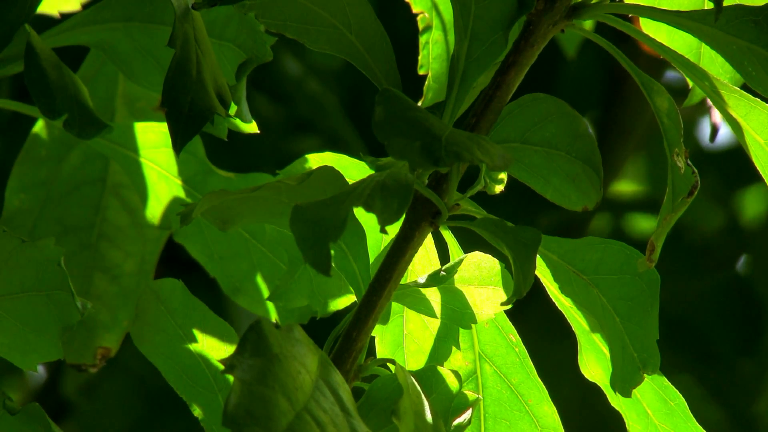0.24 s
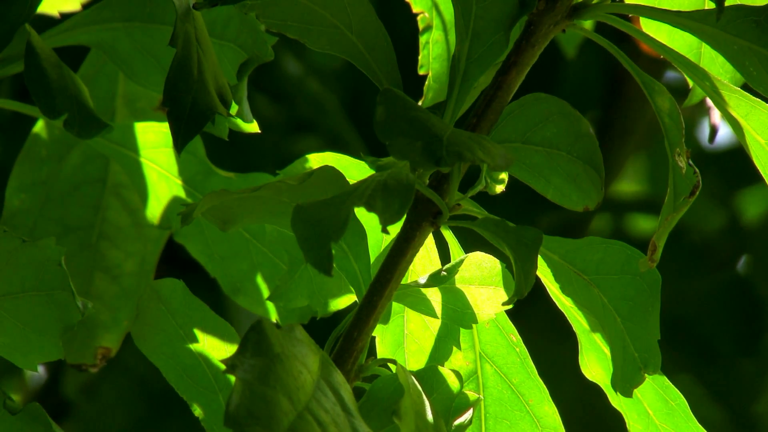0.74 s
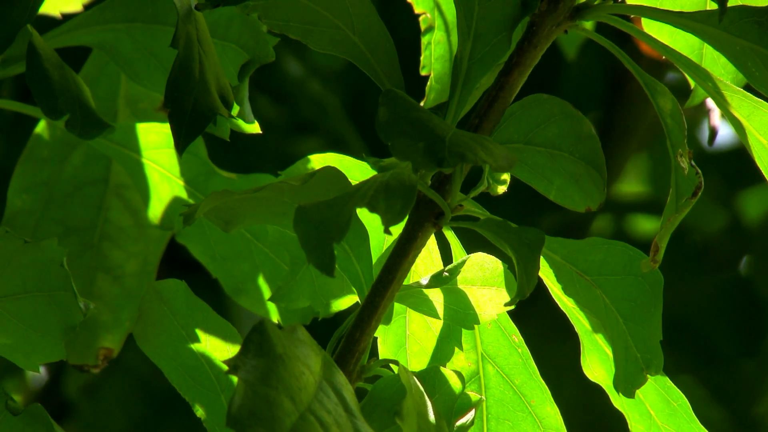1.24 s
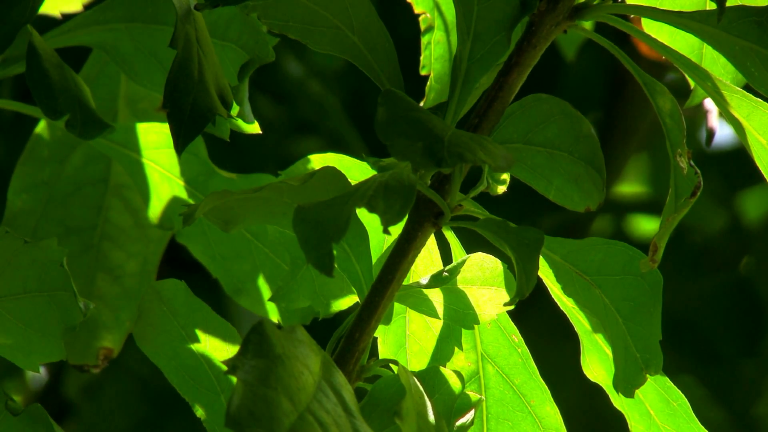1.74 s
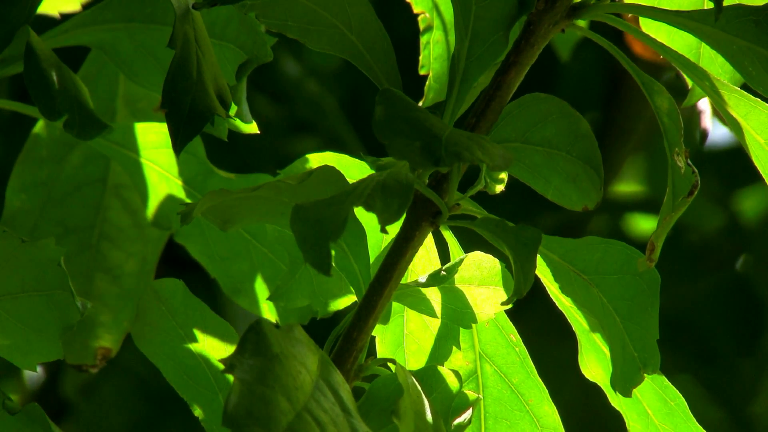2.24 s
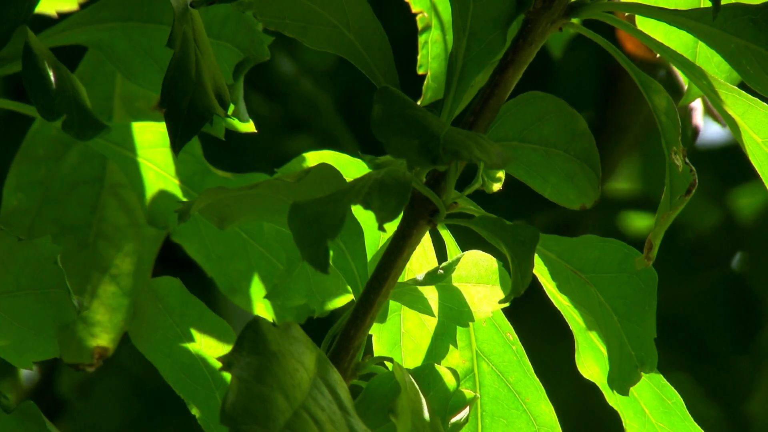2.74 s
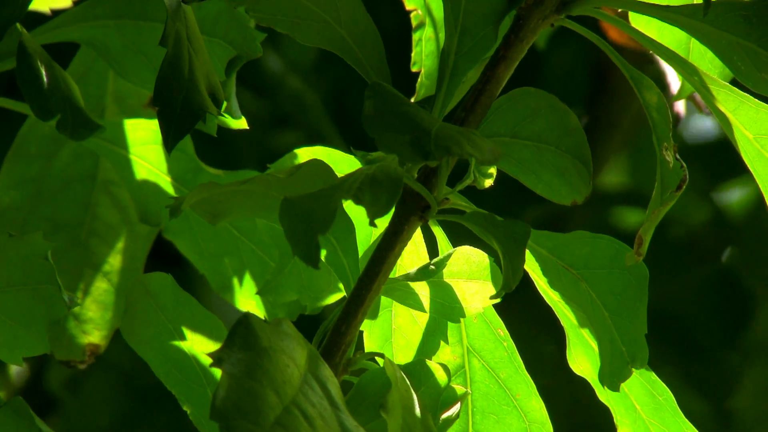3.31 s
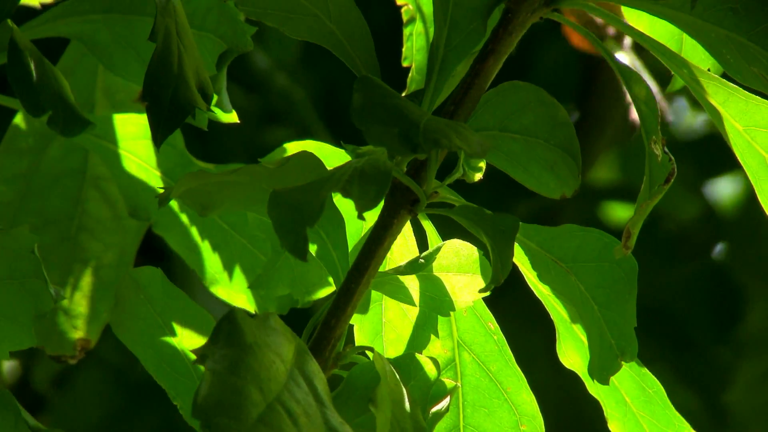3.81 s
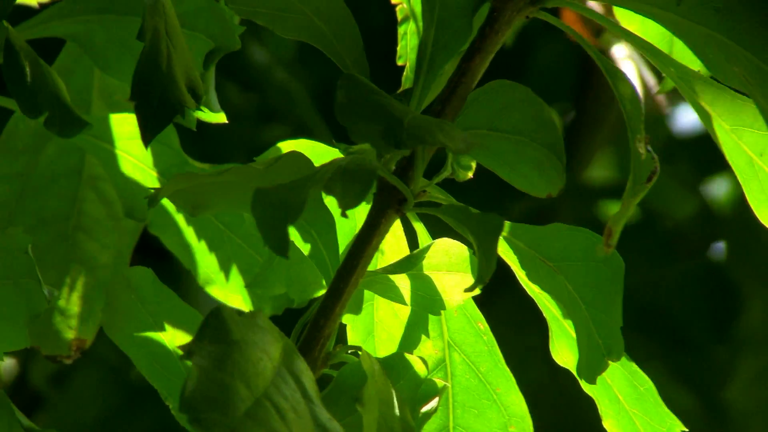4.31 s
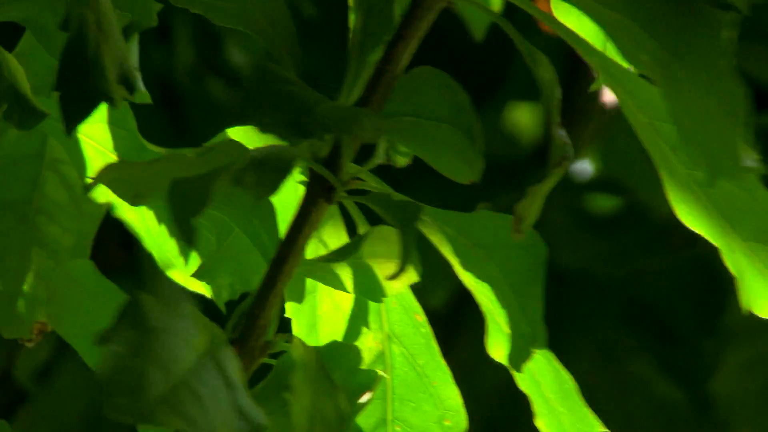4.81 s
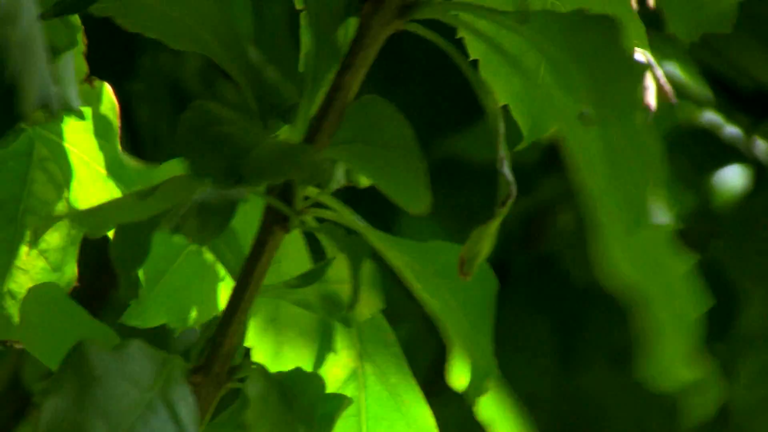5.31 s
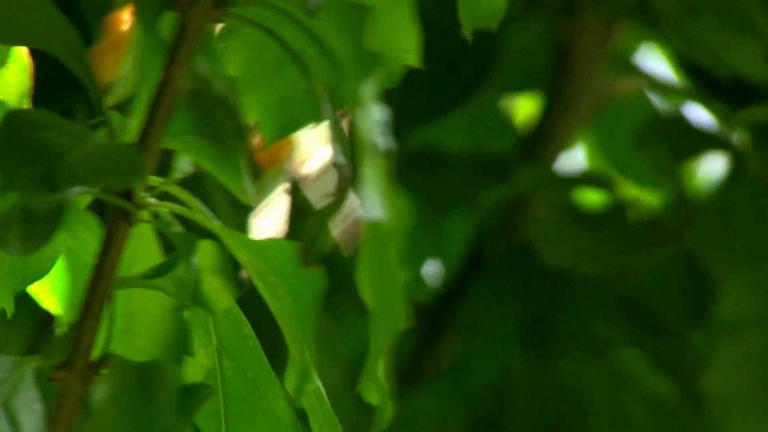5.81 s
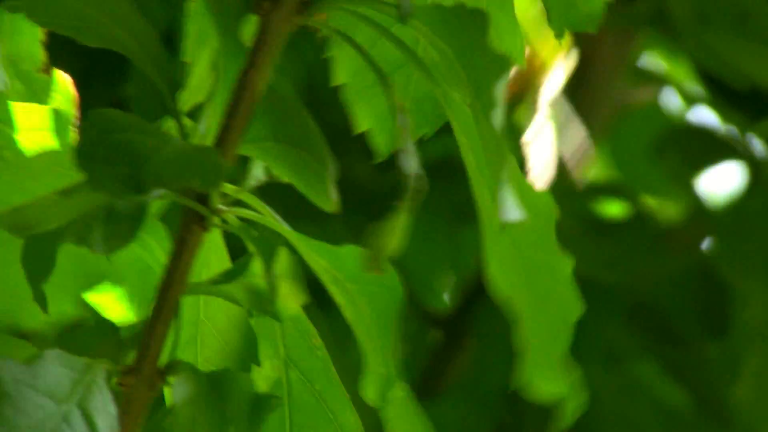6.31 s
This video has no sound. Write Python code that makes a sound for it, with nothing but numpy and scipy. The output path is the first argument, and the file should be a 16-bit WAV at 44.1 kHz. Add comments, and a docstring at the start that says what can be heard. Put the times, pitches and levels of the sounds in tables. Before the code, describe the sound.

A quiet garden, with soft distant traffic hum, faint leaf hiss and barely noticeable wind. From 0 to 1.3 seconds, tiny far whistles and blurred twitter come from other birds. At about 1.35 a nearby songbird gives a soft two-part note, then from 1.6 to 2.15 a quiet, thin whistle that drops steeply from very high and slides on down, with more faint twitter at its end. At 2.3 the song bursts out much louder: a fast, regular trill, roughly eight syllables a second, each a quick upward whistle and a snapping plunge into a short falling one. It grows fuller and brighter through 3 to 4.5, then eases slightly and ends near 5.6. Short echoes and a leafy tail follow each note, and a fine treble hiss swells with the song. Afterwards come faint distant chips, slightly stronger leaf hiss and traffic, and a small low wind bump at 6.4.

```python
"""Songbird in a leafy garden

A soft two-part note, one long falling whistle, then a fast series of rising and falling whistles, all
near sines with faint overtones and hiss. Discrete echoes and decaying noise stand for a near surface and
foliage. Far birds are short glides with noise tails; traffic, leaves and light wind are shaped noise,
and a treble hiss swells with the song."""
import sys
import numpy as np
from scipy import signal
from scipy.fft import rfft, irfft, next_fast_len
from scipy.io import wavfile
from scipy.ndimage import uniform_filter1d

SR = 44100
rng = np.random.default_rng(int(sys.argv[2]) if len(sys.argv) > 2 else 0)


def generate_wav(sig):
    """Save sig (samples, or channels by samples) to the path in sys.argv[1] as 16-bit PCM at SR."""
    pcm = np.round(np.clip(np.atleast_2d(sig).T, -1, 1) * 32767).astype(np.int16)
    wavfile.write(sys.argv[1], SR, pcm)


N = 288855


def from_db(db):
    """Turn dB into an amplitude gain."""
    return 10 ** (np.asarray(db) / 20)


def rms_one(x):
    """Scale to rms 1."""
    return x / np.sqrt(np.mean(x ** 2) + 1e-20)


def at_hz(points, hz, axis=1):
    """Read a table column on a log-frequency axis."""
    points = np.array(points)
    return np.interp(np.log(np.maximum(hz, 1)), np.log(points[:, 0]), points[:, axis])


def coloured(spectrum, size=N):
    """White noise shaped by a spectrum, then scaled to rms 1."""
    hz = np.fft.rfftfreq(size, 1 / SR)
    return rms_one(irfft(rfft(rng.standard_normal(size)) * from_db(at_hz(spectrum, hz)), size))


def drift(rate_hz):
    """Random wander of rms 1: noise through two equal one-pole lowpasses at the given rate."""
    pole = np.exp(-2 * np.pi * rate_hz / SR)
    wander = signal.lfilter([1], [1, -2 * pole, pole * pole], rng.standard_normal(N + SR))
    return rms_one(wander[SR:])     # the filter settles during the first second


def singer():
    """Each side of the voice box sings its own notes: one the rises, the other the falls and long whistle."""
    # syllables, a rise then a fall: [plunge t/s, rise level/dB, fall level/dB, landing f/Hz]
    syllables = [(1.382, -37.5, -33.5, 3172), (2.337, -21.5, -18, 3300), (2.4640, -17.5, -16.5, 3600),
                 (2.5920, -17.5, -16, 3540), (2.714, -16.5, -17, 3790), (2.8368, -15, -17.5, 3520),
                 (2.96, -15, -17, 3805), (3.0844, -14, -19.5, 3650), (3.2061, -14, -17.5, 3820),
                 (3.3283, -14.5, -17, 3910), (3.4509, -13.5, -16, 3760), (3.5730, -13, -14.5, 3790),
                 (3.6960, -14.5, -16.5, 3705), (3.8180, -14, -15.5, 3710), (3.9400, -14.5, -16.5, 3740),
                 (4.0614, -14, -16.5, 3830), (4.1827, -15, -17, 3985), (4.304, -14.5, -16, 3730),
                 (4.4259, -14, -14.5, 4110), (4.5482, -14.5, -16, 3915), (4.673, -15, -16, 3920),
                 (4.7994, -15, -18.5, 4150), (4.9253, -15.5, -18, 4080), (5.0513, -17, -18, 3950),
                 (5.1774, -17.5, -22.5, 3940), (5.3011, -16.5, -18, 4010), (5.4284, -17, -21, 3940),
                 (5.559, -17.5, -20, 3970)]
    # how the voice changes through the song:
    # [t/s, rise lead before plunge/s, glide length/s, glide end f/Hz, plunge level/dB, brightness/dB]
    voice = [(1.377, 0.036, 0.027, 3057, -22, -15), (2.333, 0.047, 0.017, 2900, -12.5, -15),
             (2.47, .047, 0.02, 2956, -15.5, -7), (3.15, .048, 0.024, 3087, -6, -5),
             (3.8, .048, 0.022, 3018, -10, -2.5), (4.393, .048, .025, 3080, -9.5, -2),
             (4.949, .049, 0.023, 3140, -8.5, -6.5), (5.56, .048, 0.022, 3166, -15.5, -10)]
    # from a moment during the long whistle, before the trill, rises and plunges grow towards full size
    warm_up_start_s, warm_up_s = 1.9, .36
    low_voice, high_voice = silence(), silence()
    when, *settings = np.transpose(voice)
    for start, rise_db, fall_db, land_hz in syllables:
        lead, glide_s, end_hz, plunge_db, bright_db = (np.interp(start, when, c) for c in settings)
        warm = 1 - np.exp(-max(start - warm_up_start_s, 0) / warm_up_s)
        low_voice = rise(low_voice, start - lead, rise_db, bright_db, warm)
        high_voice = fall(high_voice, start, land_hz, end_hz, glide_s, plunge_db, fall_db, bright_db, warm)
    slide, singing = long_whistle()
    return whistle(low_voice) + whistle(np.where(singing, slide, high_voice))


def rise(track, start, level_db, bright_db, warm):
    """A pitch climb that swells and fades; warming up makes it longer and higher."""
    # shape of a rise: [share of its length, share of the pitch climb, level/dB]
    shape = [(-.12, -.1, -66), (.001, -0.044, -23.5), (0.201, 0.21, -11.5), (.4, .48, -5.5),
             (0.618, .72, -4), (.85, .92, -11.5), (1.001, 1.001, -13.5), (1.118, 1.01, -56)]
    start_hz = 1581
    top_hz = 2480 + warm * (2804 - 2480)
    length_s = .014 + warm * (.036 - .014)
    share, climb, shape_db = np.transpose(shape)
    hz = start_hz + climb * (top_hz - start_hz)
    return lay(track, start + share * length_s, hz, shape_db + level_db, bright_db, 0)


def fall(track, start, land_hz, end_hz, glide_s, plunge_db, level_db, bright_db, warm):
    """A plunge of a few milliseconds onto the landing pitch, then a slower glide down."""
    # pitch of the plunge: [t/s, f above landing/Hz at depth 1]
    plunge_shape = [(-.001, 3800), (.0005, 2657), (.0016, 1289), (.0027, 400), (.0039, 40)]
    # at those points: [level/dB, extra hiss/dB]
    plunge_level = [(-31.5, 10), (-26.5, 27.5), (-18.5, 36.5), (-15, -1), (-16, -7)]
    # glide after the plunge: [share of its length, share of the way still to fall, level/dB]
    glide = [(0.079, 0.85, -12.5), (.25, 0.59, -6), (0.512, .36, -1.5), (0.75, 0.16, -2),
             (1.001, .001, -7.5), (1.119, 0.0071, -74)]
    duller_db = -6     # overtones and hiss against those of the rise
    depth = .45 + warm * (.94 - .45)
    t, above_hz = np.transpose(plunge_shape)
    opening_db, hiss_db = np.transpose(plunge_level)
    share, left, glide_db = np.transpose(glide)
    times = start + np.append(t, t[-1] + share * glide_s)
    hz = np.append(land_hz + depth * above_hz, end_hz + left * (land_hz - end_hz))
    levels = np.append(opening_db + plunge_db, glide_db + level_db)
    return lay(track, times, hz, levels, bright_db + duller_db, np.append(hiss_db, 0 * share))


def long_whistle():
    """One long falling slide whose overtones and hiss are strongest at high pitch; also where it sounds."""
    # pitch and level of the slide: [t/s, f/Hz, level/dB]
    points = [(1.584, 7740, -66), (1.593, 7450, -46.5), (1.611, 6930, -50.5), (1.643, 4486, -43),
              (1.68, 3600, -40), (1.74, 3210, -39.5), (1.781, 3064, -39.5), (1.952, 2396, -31),
              (1.968, 2440, -30), (2.059, 2136, -32), (2.138, 2072, -38.5), (2.17, 2088, -65)]
    t, hz, db = np.transpose(points)
    # brightness in dB grows between the two knee pitches in Hz
    bright_db = -20.5 + np.interp(hz, (3770, 4900), [0, 29])
    slide = lay(silence(), t, hz, db, bright_db, -24)
    singing = slide[1] > -100
    # a moving average over the sung part rounds the corners of the pitch
    pitch_sum = uniform_filter1d(slide[0] * singing, size=900)
    sung_share = uniform_filter1d(1. * singing, size=900)
    slide[0] = np.where(singing, pitch_sum / np.maximum(sung_share, 1e-3), slide[0])
    return slide, singing


def silence():
    """A track of (Hz, dB, brightness dB, hiss dB) too quiet to hear."""
    return np.array([3000., -150., 0., 0.])[:, None] + np.zeros(N)


def lay(track, t, *columns):
    """Write one note over a track, with straight lines between its points."""
    i = np.arange(max(int(t[0] * SR), 0), min(int(t[-1] * SR), N))
    track = track.copy()
    track[:, i] = [np.interp(i / SR, t, np.broadcast_to(c, len(t))) for c in columns]
    return track


def whistle(track):
    """A near sine with faint overtones and hiss, both coloured by the beak."""
    # overtones: [multiple of the fundamental, level/dB before beak colour and brightness]
    overtones = [(2, -17), (3, -28), (4, -25), (5, -26), (6, -35)]
    # beak colour of overtones and hiss: [f/Hz, level/dB]
    beak = [(3000, -29), (6000, -28), (7500, -1.5), (8500, -3), (9500, -9.5), (11000, -3), (13000, -2),
            (14200, -14), (15800, -14.5)]
    breath_db, wobble = -31, .004   # hiss before brightness; rms share of the pitch
    hz, db, bright_db, hiss_db = track
    hz = hz * (1 + wobble * drift(131.5))
    phase = 2 * np.pi * np.cumsum(hz) / SR
    upper = from_db(breath_db + hiss_db) * coloured(beak)
    for k, level_db in overtones:
        audible = k * hz < .45 * SR     # leave out overtones that would alias
        gain = from_db(level_db + at_hz(beak, k * hz))
        upper = upper + audible * gain * np.sin(k * phase)
    return from_db(db) * (np.sqrt(2) * np.sin(phase) + from_db(bright_db) * upper)


def garden(song):
    """Hard echoes, duller than the direct sound, and scatter that changes as the bird turns its head."""
    # echoes: [delay t/s, level/dB before dulling]
    echoes = [(.00211, -32), (.00371, -3.5), (.00589, -19.5), (.00771, -9), (0.0115, -32), (0.0139, -21.5),
              (0.0181, -9.5), (.036, -17.5), (.09, -26)]
    dull_hz = 5200
    size = next_fast_len(N + SR)
    hz = np.fft.rfftfreq(size, 1 / SR)
    reflected = sum(from_db(db) * np.exp(-2j * np.pi * hz * t) for t, db in echoes)
    reflected = reflected / np.sqrt(1 + (hz / dull_hz) ** 4)
    near = irfft(rfft(song, size) * (1 + reflected), size)[:N]
    turn = .5 * drift(3.6)      # head angle in radians
    # the turn crossfades between two independent scatters
    one, other = (signal.fftconvolve(song * aim, scatter())[:N] for aim in (np.cos(turn), np.sin(turn)))
    return near + one + other


def scatter():
    """Response of the foliage: noise that dies band by band."""
    # foliage: [f/Hz, level/dB, t60/s]
    foliage = [(1530, -24.5, 0.88), (2650, -2, 0.15), (3940, -6.5, 0.3), (6170, 6.5, 0.085),
               (13000, 12.5, 0.17)]
    t = np.arange(SR // 2) / SR
    edges = 1200 * 2 ** np.arange(0, 4, .5)     # half-octave steps in Hz
    tail = 0
    for low, high in zip(edges, np.append(edges[1:], 18000)):
        centre = np.sqrt(low * high)
        dying = rng.standard_normal(len(t)) * (1 - np.exp(-t / .004))     # soft onset
        dying = dying * from_db(-60 * t / at_hz(foliage, centre, axis=2))
        dying = dying / np.sqrt(np.sum(dying ** 2))
        band = signal.butter(2, [low, high], "band", fs=SR, output="sos")
        tail = tail + from_db(at_hz(foliage, centre)) * signal.sosfilt(band, dying)
    return tail


def far_birds():
    """Single whistles, and bouts of twitter made of random steep chips that blur into a wash."""
    # far whistles: [t/s, length/s, start f/Hz, end f/Hz, level/dB]
    whistles = [(.2, 0.041, 3770, 3767, -53.5), (0.415, 0.069, 4320, 4650, -57.5),
                (.49, 0.044, 3800, 3050, -57), (1.04, 0.14, 3510, 3300, -63),
                (1.21, 0.034, 3330, 3300, -59), (1.225, 0.032, 4540, 4595, -53),
                (2.024, 0.086, 4320, 4670, -58.5), (2.1, 0.066, 4110, 3680, -59),
                (5.954, 0.027, 4480, 4760, -51), (6.384, 0.017, 4670, 4300, -54)]
    # bouts of twitter: [t/s, length/s, level/dB of each chip before its tail]
    bouts = [(.001, 0.065, -54), (0.906, 0.17, -55), (1.276, 0.09, -63), (2.159, 0.2, -53),
             (5.724, 0.083, -54), (5.99, 0.053, -60)]
    low_hz, high_hz = 2950, 5300
    span, chips = high_hz - low_hz, []
    for t, length, db in bouts:
        for when, start, end in rng.random((24, 3)):
            start_hz = high_hz - .6 * start * span
            end_hz = low_hz + .3 * end * span
            chips.append((t + when * length, .02, start_hz, end_hz, db))
    return from_afar(whistles, .23, 1) + from_afar(chips, .6, 0)


def from_afar(notes, t60_s, direct):
    """Short sine glides smeared by a decaying noise tail, plus a share of the direct sound."""
    out = np.zeros(N)
    for start, length, start_hz, end_hz, db in notes:
        start = max(start, 0)
        i = np.arange(int(start * SR), min(int((start + length) * SR), N))
        hz = np.geomspace(start_hz, end_hz, len(i))
        swell = np.sqrt(np.hanning(len(i)))
        out[i] += from_db(db) * swell * np.sin(2 * np.pi * np.cumsum(hz) / SR)
    t = np.arange(SR // 2) / SR
    tail = rng.standard_normal(len(t)) * from_db(-60 * t / t60_s)
    tail = tail / np.sqrt(np.sum(tail ** 2))
    return direct * out + signal.fftconvolve(out, tail)[:N]


def background(song):
    """Traffic, leaves with the treble hiss, and wind together, each from fresh noise."""
    now = np.arange(N) / SR
    return traffic(now) + leaves_and_treble_hiss(now, song) + wind(now)


def traffic(now):
    """Distant traffic: a steady-coloured noise hum whose level moves slowly."""
    # hum colour: [f/Hz, relative level/dB]
    colour = [(24, -46), (40, -10), (93, -9.5), (135, -4.5), (174, -9.5), (238, -8.5), (339, -9.5),
              (369, -9), (692, -10.5), (785, -8.5), (2540, -22.5), (3860, -25.5), (6000, -35), (7800, -59),
              (13200, -120)]
    # loudness of the hum: [t/s, rms level/dB]
    level = [(0, -48.5), (2.1, -48), (4.3, -46.5), (5.5, -45), (6.55, -46.5)]
    return from_db(np.interp(now, *np.transpose(level))) * coloured(colour)


def leaves_and_treble_hiss(now, song):
    """Leaf hiss, and apart from the leaves a treble hiss that swells with the song: one flickering noise."""
    # colour of both: [f/Hz, relative level/dB]
    colour = [(1760, -55), (3000, 12), (3690, -39), (4300, -6), (4640, 10.5), (5750, 9.5), (9590, 7),
              (15700, -6.5)]
    # loudness of the leaf hiss before flicker: [t/s, level/dB]
    level = [(0, -64), (2.1, -66), (5.8, -59.5), (6.55, -58)]
    swell_db, window_s = -34, .31     # treble hiss against the song's rms; window of that rms
    loudness = np.sqrt(np.abs(uniform_filter1d(song ** 2, size=int(window_s * SR))))
    leaf_gain = from_db(np.interp(now, *np.transpose(level)))
    treble_gain = from_db(swell_db) * loudness
    flicker = from_db(.11 * drift(8.5))
    return (leaf_gain + treble_gain) * flicker * coloured(colour)


def wind(now):
    """Light wind: low shaped noise, a steady breeze plus bell-shaped gusts, made lumpy by slow drift."""
    # wind colour: [f/Hz, relative level/dB]
    colour = [(15, -6), (30, 0), (45, -4), (80, -12), (130, -14), (250, -32), (600, -80)]
    # gusts: [centre t/s, half width/s, level/dB before the lumps]
    gusts = [(.01, 0.12, -61), (5.6, 0.19, -59.5), (6.049, 0.29, -61), (6.42, .09, -44.5)]
    breeze_db, lumps_db = -64.5, 2.0
    blowing = from_db(breeze_db)
    blowing = blowing + sum(from_db(db) * np.exp(-((now - t) / width) ** 2) for t, width, db in gusts)
    return blowing * from_db(lumps_db * drift(2.9)) * coloured(colour)


def scene():
    """All sources reach both ports alike; a little background and treble scatter has opposite sign."""
    own_noise_db, wide_db = -24, -20.5
    song = singer()
    shared = garden(song) + far_birds() + background(song)
    treble = signal.sosfilt(signal.butter(2, 6500, "high", fs=SR, output="sos"), song)
    wide = from_db(wide_db) * signal.fftconvolve(treble, scatter())[:N]
    own = from_db(own_noise_db) * background(song) + wide
    return np.array([shared + own, shared - own])


def record(dry):
    """The two ports differ by a nearly constant phase and a small level offset; the top is cut."""
    # phase between the ports: [f/Hz, lead of the right port/rad]
    port_phase = [(40, 0.35), (150, 0.38), (3000, 0.42), (8000, 0.49), (14000, 0.3)]
    left_db, cutoff_hz = -.5, 16020     # left port against right; start of the cut top
    size = next_fast_len(N + 4096)
    half = at_hz(port_phase, np.fft.rfftfreq(size, 1 / SR)) / 2
    turned = irfft(rfft(dry, size) * np.exp(1j * half * [[-1], [1]]), size)[:, :N]
    turned = turned * from_db([[left_db / 2], [-left_db / 2]])
    return signal.sosfilt(signal.cheby2(20, 80, cutoff_hz, fs=SR, output="sos"), turned)


dry = scene()
out = record(dry)
generate_wav(out)
```